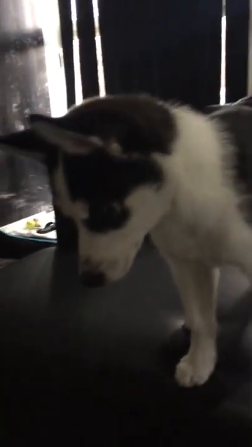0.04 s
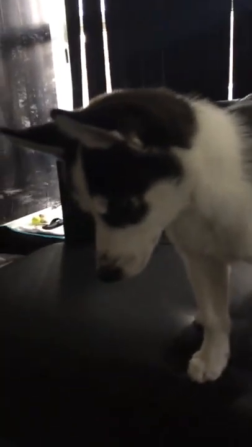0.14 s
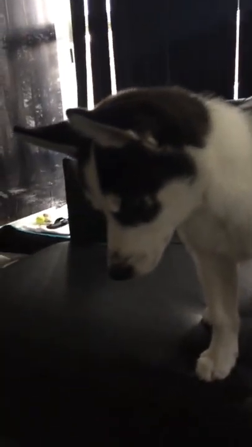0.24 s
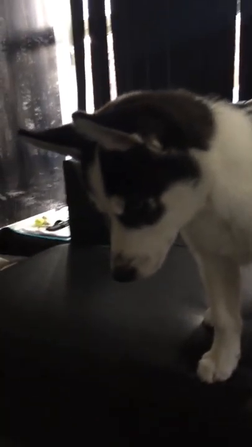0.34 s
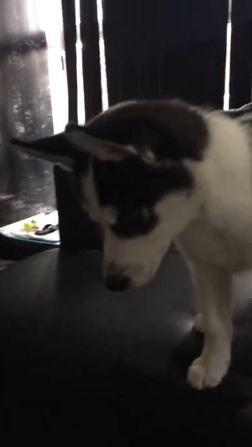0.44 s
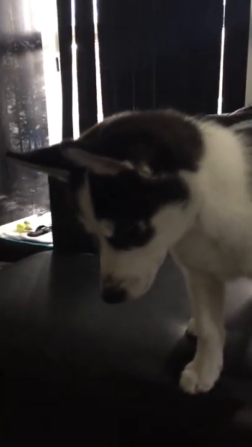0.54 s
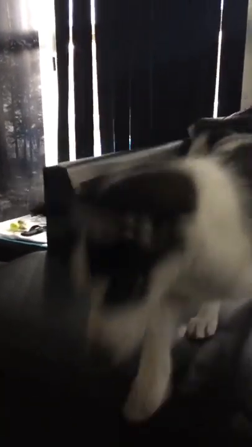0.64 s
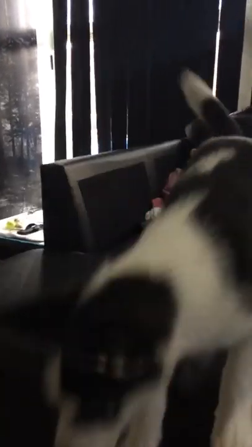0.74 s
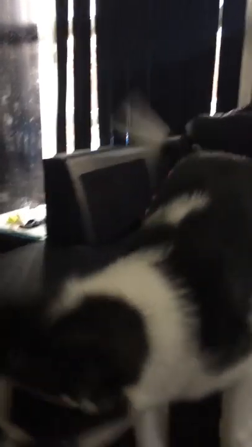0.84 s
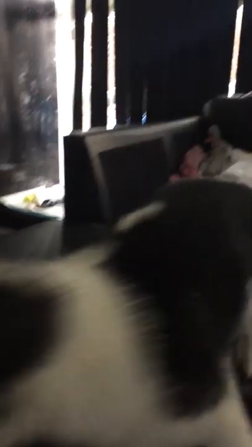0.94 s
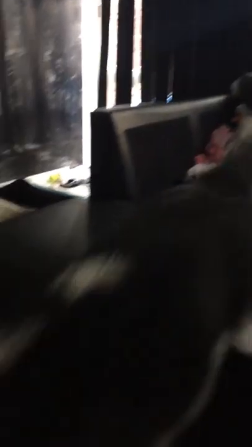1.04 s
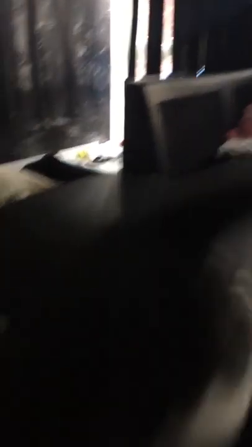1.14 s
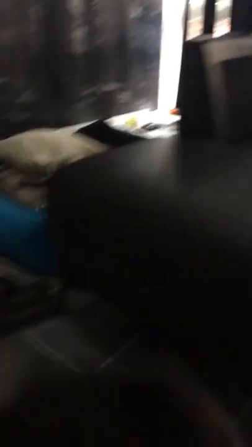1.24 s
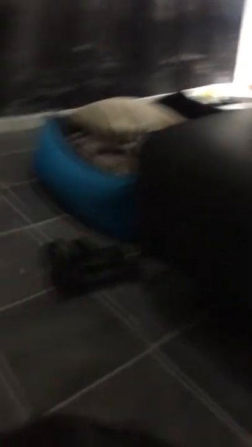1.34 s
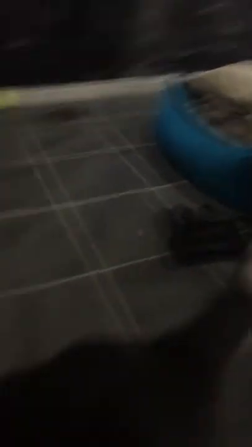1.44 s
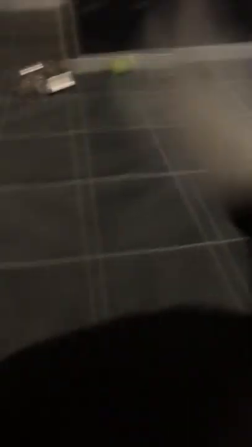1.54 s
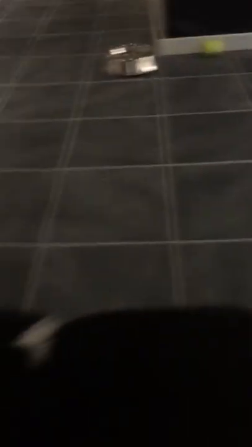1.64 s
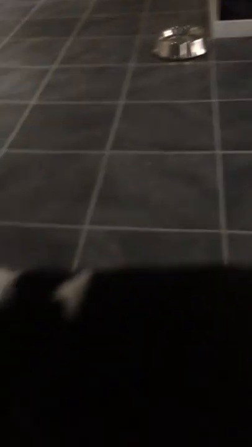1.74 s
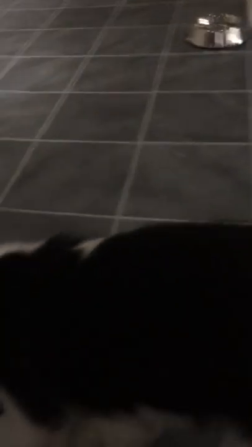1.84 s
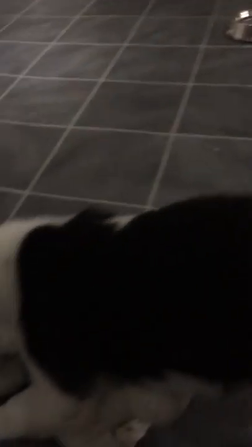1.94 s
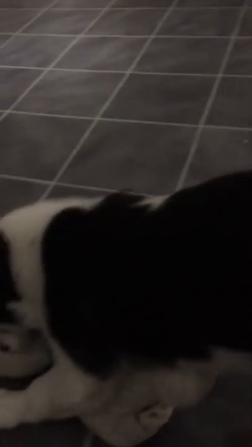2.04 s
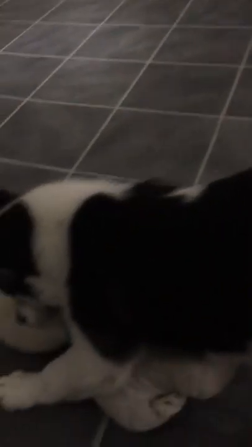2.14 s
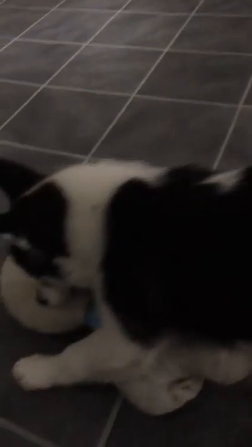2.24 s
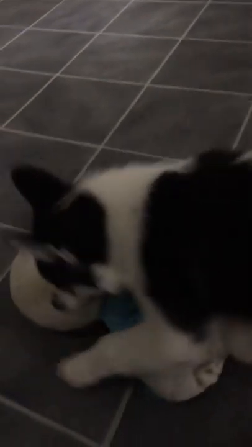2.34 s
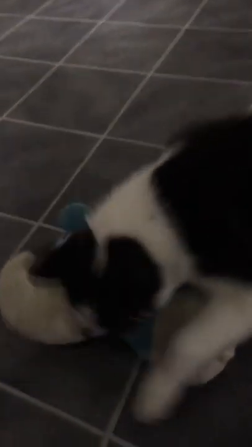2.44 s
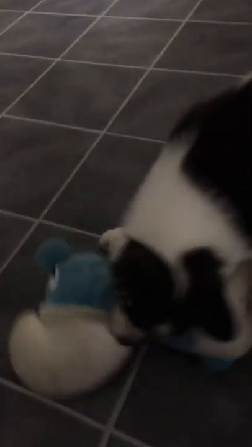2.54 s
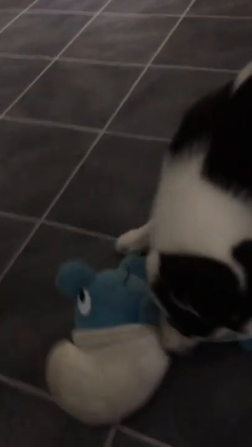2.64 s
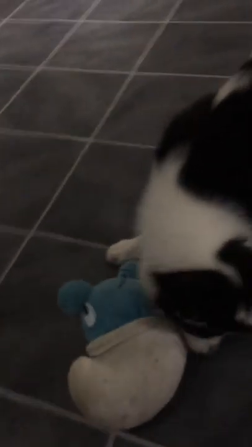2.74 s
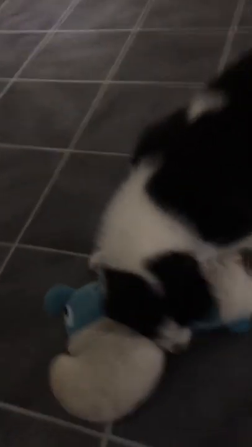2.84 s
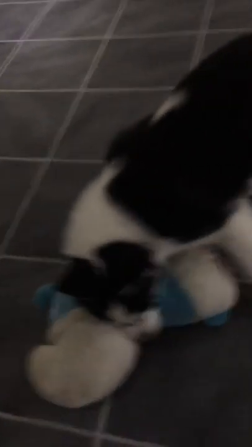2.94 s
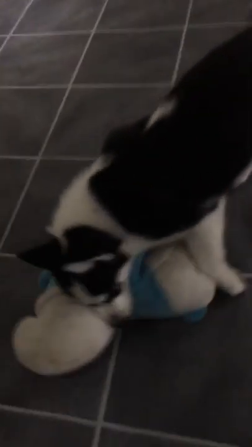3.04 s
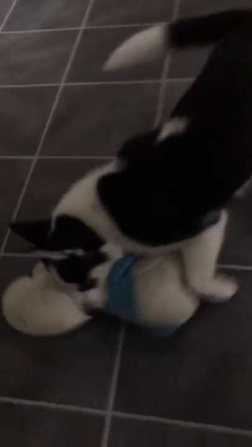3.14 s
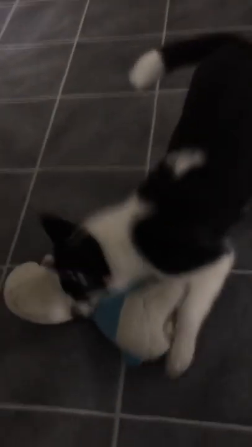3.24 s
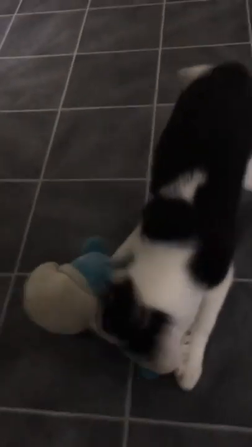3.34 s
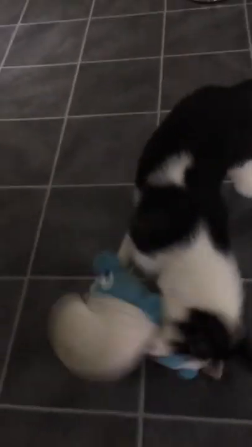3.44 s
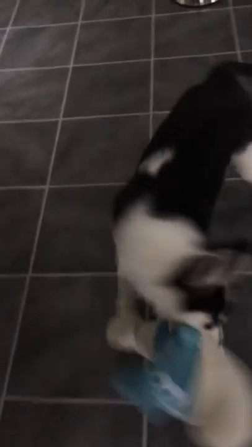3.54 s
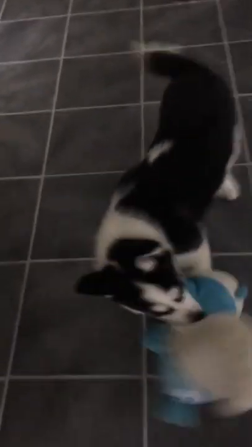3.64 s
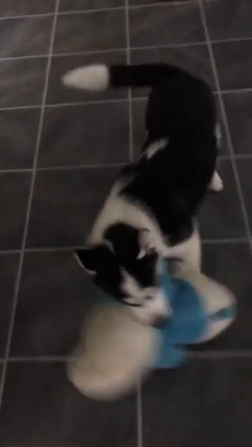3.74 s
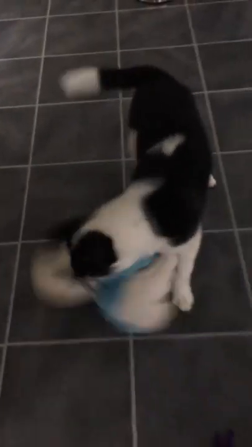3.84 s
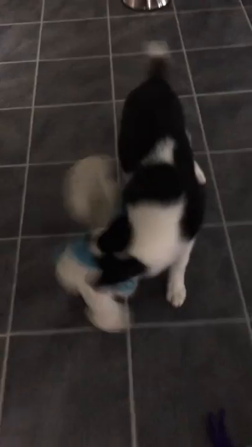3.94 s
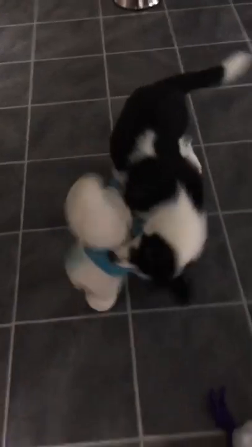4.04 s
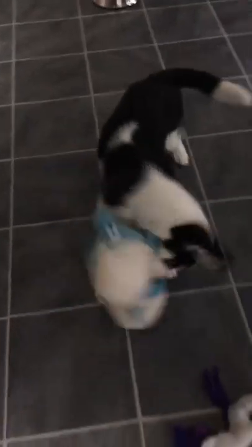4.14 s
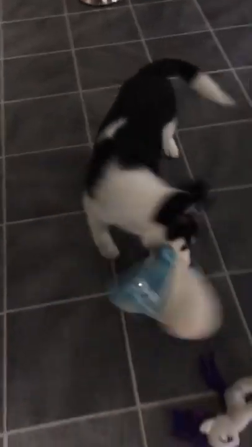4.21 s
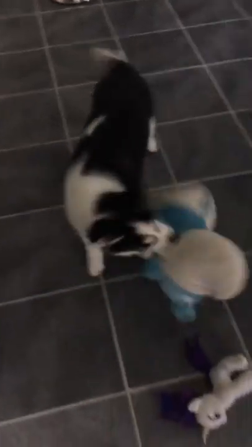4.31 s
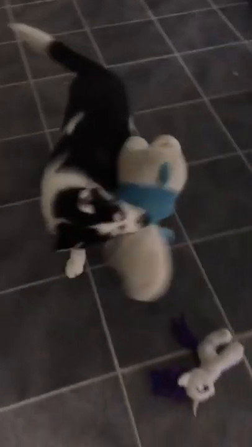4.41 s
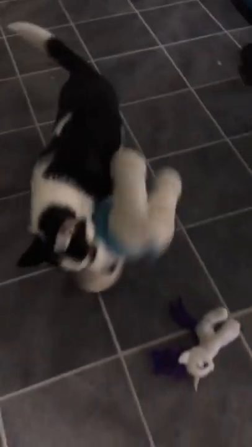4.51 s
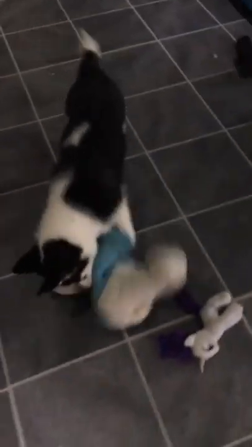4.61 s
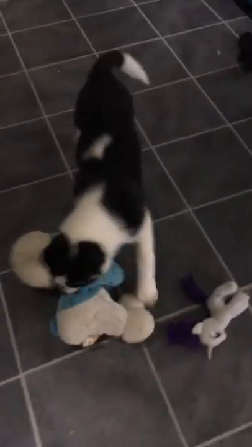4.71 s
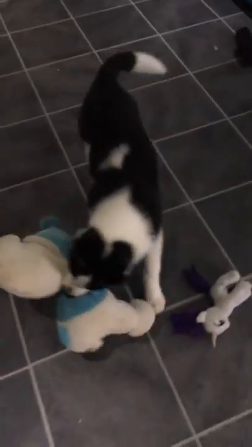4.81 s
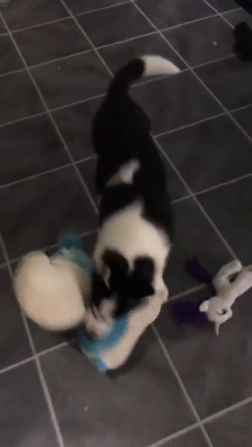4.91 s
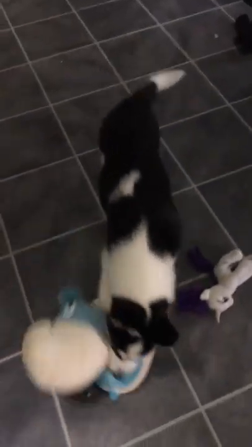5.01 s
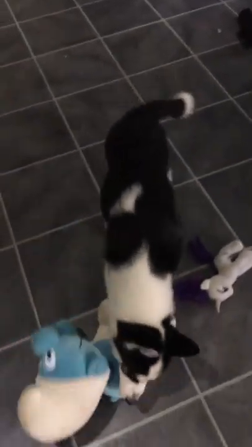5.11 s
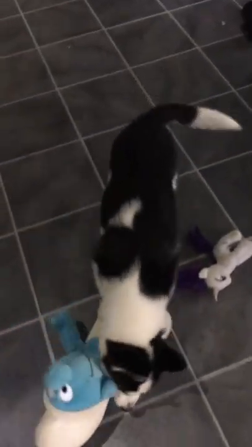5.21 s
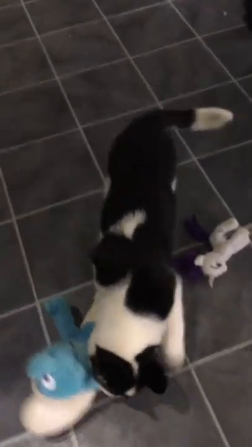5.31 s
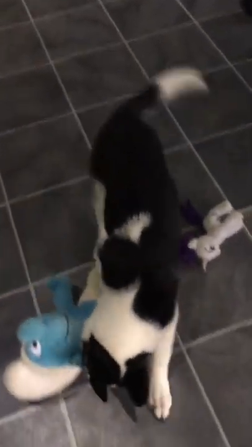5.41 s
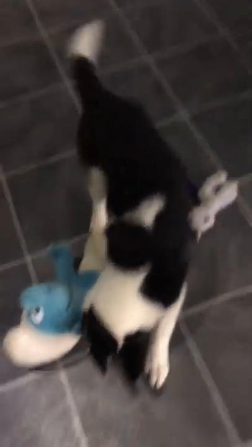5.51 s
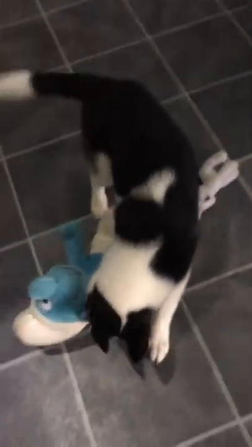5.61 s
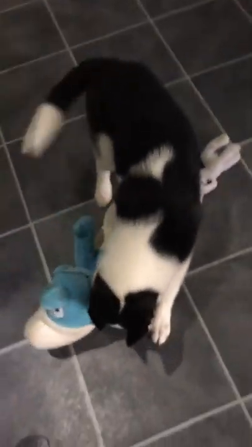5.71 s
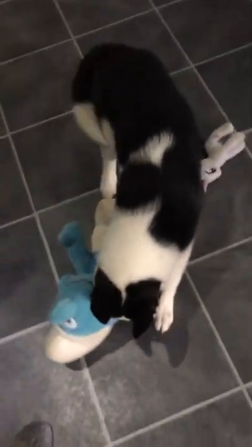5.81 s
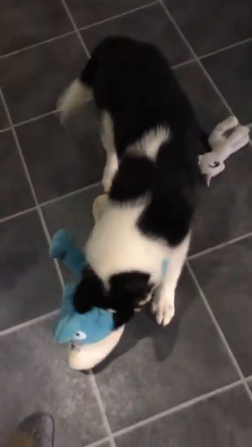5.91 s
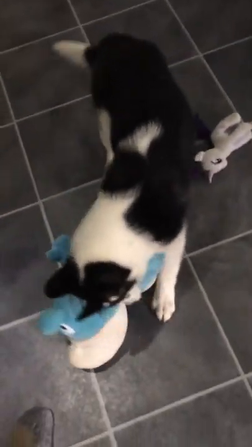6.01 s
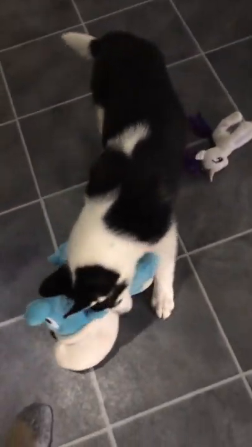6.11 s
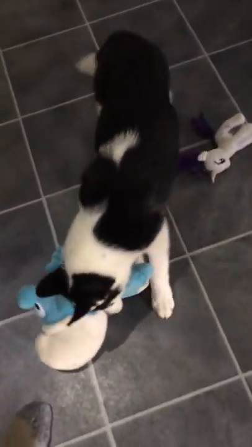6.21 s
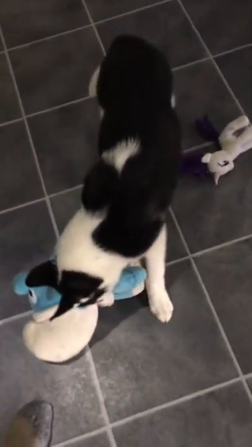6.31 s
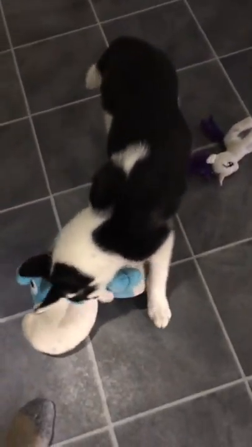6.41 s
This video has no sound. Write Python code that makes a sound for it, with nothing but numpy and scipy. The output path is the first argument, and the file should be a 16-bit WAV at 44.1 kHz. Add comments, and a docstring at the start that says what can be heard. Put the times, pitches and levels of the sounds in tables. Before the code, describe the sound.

Sudden heavy thuds and claw skids as a young dog bounds across hard tiles, followed by quieter plush rubbing, small bumps and short scrapes.

```python
"""Puppy and plush toy in a small tiled room

A puppy jumps from a padded seat, bounds across a tiled floor and wrestles a plush toy.
Seat and slaps: rustling noise under each shove; an air pulse, a crack and ringing surface modes.
Paws and body: short low pushes set the floor and room booming. Claws: brief bursts of noise.
Skids, swishes, drags and rubbing: coloured grains of friction, swelling and fading.
The hard room adds two reflections and a tail; the microphone thins the bass and rounds the peaks."""
import sys
import numpy as np
from scipy import signal
from scipy.fft import rfft, irfft, next_fast_len
from scipy.io import wavfile

SR = 44100
rng = np.random.default_rng(int(sys.argv[2]) if len(sys.argv) > 2 else 0)


def master(y):
    """Save y as 16-bit WAV."""
    cut = np.clip(np.atleast_2d(y).T, -1, 1)
    pcm = np.round(cut * 32767)  # scale
    wavfile.write(sys.argv[1], SR, pcm.astype(np.int16))


N = 284886
TIME = np.arange(N) / SR

# Quiet background of the place. Each row: frequency in Hz, relative level in dB per Hz.
BACKGROUND_SPECTRUM = [(15, -44), (25, -23.5), (53, -5), (102, -9.5), (263, -7.5), (363, -14.5), (659, -19),
                       (734, -23), (840, -33), (1130, -24.5), (2000, -27.5), (5430, -32), (16000, -36.5)]
# How briskly the dog moves about. Each row: time in seconds, level of the rubbing in dB.
MOVEMENT = [(0, -62), (.18, -77), (.58, -75), (.70, -56), (1.2, -60), (1.62, -47), (1.8, -55), (1.9, -64),
            (2.15, -68.5), (2.45, -61), (2.8, -55), (3.55, -62), (3.9, -59), (4.15, -63.5), (4.95, -60),
            (5.25, -58), (5.85, -61), (6.0, -74)]
# Timbre of soft rubbing. Each row: frequency in Hz, relative level in dB per Hz.
RUB_SPECTRUM = [(100, -0.5), (300, 5), (600, -0.5), (1400, -3), (2200, -7.5), (3600, -7), (6000, -15),
                (12000, -28.5)]
# Timbre of swishing fabric and fur. Each row: frequency in Hz, relative level in dB per Hz.
FABRIC_SPECTRUM = [(300, -6), (800, -15), (2000, -3.5), (4000, -3), (7000, 3.5), (10000, 0.5), (13500, 0.5),
                   (16000, -10.5)]
# Paws, body and toy landing. Each row: time in seconds, level of the push in dB,
# pitch of the push in Hz, level in dB of the weight settling after it.
LANDINGS = [(.014, -42, 265, -29.5), (0.791, -28, 109, -44), (.808, -31, 199, -25),
            (0.885, -21.5, 170, -34), (.947, -27, 130, -16), (.986, -15.5, 162, -32),
            (1.269, -8.5, 287, -32), (1.282, -16, 140, -40), (1.314, -23, 203, -48),
            (1.383, -13, 346, -39.5), (1.388, -6.5, 290, -30), (1.397, -8, 208, -36), (1.569, -5, 248, -26),
            (1.609, -14.5, 221, -40), (1.704, -10.5, 308, -30), (2.248, -32, 235, -51),
            (2.485, -33, 280, -44), (2.492, -30.5, 222, -41), (2.633, -35, 218, -52),
            (2.659, -35, 282, -60), (2.808, -32, 230, -40), (2.821, -33, 290, -58),
            (3.004, -34.5, 237, -59), (3.142, -40, 303, -64), (3.284, -38.5, 327, -64),
            (3.377, -32.5, 251, -60), (3.696, -27, 255, -54), (3.706, -33, 253, -71),
            (3.748, -44, 200, -35), (3.783, -41, 200, -45), (3.823, -40, 146, -50),
            (4.762, -28.5, 205, -55), (4.875, -32.5, 243, -33.5), (5.09, -44, 275, -60),
            (5.154, -55, 200, -43), (5.300, -30.5, 227, -60), (5.493, -17.5, 256, -32),
            (5.681, -44, 168, -58)]
# Low resonances of floor and room. Each row: frequency in Hz, level in dB, t60 in seconds.
FLOOR_RESONANCES = [(61.1, -24, 0.13), (134.7, -19, 0.2), (191, -15.5, 0.096), (280, -22, 0.12),
                    (356.7, -14.5, 0.1), (396, -24.5, 0.068), (522, -19.5, 0.22), (583, -17, 0.17),
                    (670, -18, 0.34)]
# Sliding strokes. Each row: time of the peak in seconds, rise in seconds,
# skid on the tile in dB, fabric swish in dB.
SLIDING_STROKES = [(0.694, 0.044, -74, -57), (0.821, 0.03, -57, -44), (.873, .02, -38.5, -32),
                   (.93, .04, -58, -40), (.987, .02, -62, -39.5), (1.277, .005, -55, -37),
                   (1.323, 0.029, -43, -43), (1.392, 0.014, -36, -35), (1.469, .016, -39, -38),
                   (1.509, .013, -29.5, -31), (1.572, .03, -31, -44), (1.71, 0.064, -40, -42),
                   (1.95, .06, -67, -63), (2.246, .004, -62, -58), (2.666, 0.026, -54, -44.5),
                   (2.708, .05, -48, -50), (2.808, .007, -53.5, -49), (2.975, .024, -59, -53.5),
                   (3.08, 0.011, -55.5, -54), (3.148, 0.023, -44.5, -60), (3.21, 0.063, -50.5, -68),
                   (3.295, 0.016, -30.5, -37), (3.33, .034, -26.5, -37), (3.621, .055, -54, -53.5),
                   (3.759, 0.0039, -63, -55), (3.935, .04, -58, -58), (4.278, 0.14, -56.5, -72.5),
                   (4.448, 0.013, -43, -51), (4.494, .024, -41, -56), (4.654, .04, -52, -65.5),
                   (4.762, .008, -55, -70), (5.127, .014, -40.5, -56), (5.17, .06, -52, -68),
                   (5.30, .05, -57, -61), (5.327, .016, -42, -45.5), (5.36, .03, -45, -56),
                   (5.509, 0.014, -51, -54), (5.76, 0.03, -49, -55), (5.824, .055, -43.5, -58),
                   (6.44, 0.078, -66, -68)]
# Timbre of a skid on tile. Each row: frequency in Hz, relative level in dB per Hz.
SKID_SPECTRUM = [(300, -21), (900, -18.5), (1500, -10.5), (2100, -7), (2800, -2), (3800, 2.5), (5200, -2),
                 (7700, -11.5), (14000, -25), (16000, -31)]
# Paws shoving against the padded seat. Each row: time of the peak in seconds, level in dB.
SEAT_SHOVES = [(.803, -35), (.875, -22.5), (.985, -31.5), (1.135, -46)]
# Timbre of the crumpling seat cover. Each row: frequency in Hz, relative level in dB per Hz.
COVER_SPECTRUM = [(30, -15.5), (65, 7.5), (180, 4.5), (400, -6.5), (700, -6), (1200, -9.5), (2400, -8.5),
                  (4500, -30.5), (13000, -40)]
# Sharp slaps on the seat and the floor. Each row: start in seconds, peak of the air pulse in dB,
# inverse of the pulse's length in Hz, level of the crack in dB, level of the shudder in dB.
FLAT_SLAPS = [(0.7869, -23, 1016, -34, -45), (0.8052, -20.5, 1226, -32.5, -37), (0.881, -1, 800, -20, -23),
              (0.8934, -2.5, 2180, -17, -27.5), (0.963, -12, 910, -28.5, -30.5),
              (0.9829, -6, 1420, -14, -31), (1.217, -41, 1500, -52, -49), (1.267, -21, 589, -36.5, -27.5),
              (1.3899, -24, 790, -20, -28), (1.5624, -28, 1200, -30, -36.5),
              (1.572, -30.5, 1200, -27.5, -31.5), (1.708, -35, 904, -28, -40), (3.141, -29, 1400, -45, -50),
              (3.1605, -39, 1230, -48, -50), (3.281, -30, 1400, -42, -49), (5.4891, -20, 680, -37.5, -31),
              (5.516, -42, 601, -56, -37)]
# Modes of the slapped surfaces. Each row: frequency in Hz, typical relative level in dB.
SURFACE_MODES = [(290, -1.5), (410, -0.5), (520, 3), (583, 4.5), (670, 4.5), (740, -6), (837, -4),
                 (920, -2.5), (1082, -5), (1160, -3.5), (1290, -5.5), (1415, -7), (1584, -9), (1807, -14)]
# Single claws on tile. Each row: start in seconds, peak in dB.
CLAW_TICKS = [(1.3918, -16), (1.3989, -21), (1.4735, -22), (1.5033, -18), (1.5115, -18), (2.3044, -41),
              (2.5357, -43), (2.8075, -37), (3.0759, -37), (3.1451, -27), (3.1610, -33), (3.2189, -36),
              (4.4495, -33), (4.4853, -29), (5.3245, -30)]
# Toy dragged softly over the floor. Each row: time of the middle in seconds,
# half length in seconds, centre frequency in Hz, level in dB.
TOY_DRAGS = [(2.41, 0.036, 1420, -59), (2.775, 0.016, 1390, -58.5), (3.825, 0.038, 620, -54),
             (3.835, 0.038, 1530, -58), (3.933, 0.038, 794, -60), (4.934, 0.02, 1130, -59.5)]
# First reflections (about 3 and 6 m of extra path). Each row: delay in seconds, level in dB.
REFLECTIONS = [(.0098, -20.5), (0.0175, -24)]
# Decay of the room, held within limits in room(). Each row: frequency in Hz, t60 in seconds.
ROOM_DECAY = [(100, 0.7), (300, 0.31), (800, 0.57), (2000, 0.5), (4500, .5), (9000, -0.2), (16000, 0.3)]
# Strength of the room's tail. Each row: frequency in Hz, level in dB.
ROOM_LEVEL = [(100, -6.5), (300, -9.5), (800, -10), (2000, -8.5), (4000, -10.5), (9000, -26), (16000, -17)]


def from_db(db):
    """Decibels to gain."""
    return 10 ** (np.asarray(db) / 20)


def rms_one(x):
    """Scale to unit rms."""
    return x / np.sqrt(np.mean(x ** 2) + 1e-20)


def at_hz(points, hz):
    """Read a spectrum on a log-frequency axis."""
    known_hz, values = np.transpose(points)
    return np.interp(np.log(np.maximum(hz, 1)), np.log(known_hz), values)


def butter(x, hz, kind, order=2):
    """Causal Butterworth filter."""
    sections = signal.butter(order, np.minimum(hz, SR / 2 - 100), kind, fs=SR, output="sos")
    return signal.sosfilt(sections, x + 1e-18)


def coloured(x, spectrum):
    """Give a steady excitation a spectrum and unit rms."""
    size = next_fast_len(N)
    gain = from_db(at_hz(spectrum, np.fft.rfftfreq(size, 1 / SR)))
    return rms_one(irfft(rfft(x, size) * gain, size)[:N])


def add(out, s, sound):
    """Mix a short sound in from time s, or from the very start if s is negative."""
    start = max(round(s * SR), 0)
    out[start:start + len(sound)] += sound[:N - start]


def friction(spectrum, grains_per_s, spread_db, judder_db, judder_hz):
    """Countless tiny slips of uneven size, in clumps when the grip judders."""
    slips = (rng.random(N) < grains_per_s / SR) * rng.standard_normal(N)
    sizes = from_db(spread_db * np.minimum(rng.exponential(1, N), 4))
    wander = rms_one(butter(rng.standard_normal(N), judder_hz, "low"))
    grip = from_db(judder_db * wander)
    return coloured(slips * sizes * grip, spectrum)


def slide(rise_s, t60_s):
    """Speed of one slide: a straight rise, then an exponential fall."""
    t = np.arange(SR * 3 // 4) / SR
    return np.minimum(t / rise_s, 1) * from_db(-60 * np.maximum(t - rise_s, 0) / t60_s)


def ring(drive, hz, t60):
    """A damped resonance: a unit click sets a sine of height 1 ringing."""
    radius = from_db(-60 / (t60 * SR))
    angle = 2 * np.pi * hz / SR
    poles = [1, -2 * radius * np.cos(angle), radius * radius]
    return signal.lfilter([0, np.sin(angle)], poles, drive + 1e-18)


def ambience(level_db=-63.5):
    """Steady coloured noise is the quiet background of the place."""
    return from_db(level_db) * coloured(rng.standard_normal(N), BACKGROUND_SPECTRUM)


def shuffle(fur_below_rub_db=9):
    """Fur, plush and paws keep rubbing faintly as the dog moves."""
    s, level_db = np.transpose(MOVEMENT)
    movement = from_db(np.interp(TIME, s, level_db))
    rub = friction(RUB_SPECTRUM, grains_per_s=4600, spread_db=0.5, judder_db=2.0, judder_hz=34.65)
    fur = friction(FABRIC_SPECTRUM, grains_per_s=7500, spread_db=-0.5, judder_db=1.0, judder_hz=30)
    return movement * (rub + from_db(-fur_below_rub_db) * fur)


def thuds(pad_hz=850, body_hz=390, body_t60=0.0053, body_db=-10):
    """A soft pad shoves the floor, settles and rebounds; the body knocks and low resonances boom on."""
    # half length of a push; a gentle contact is more drawn out, per dB below full scale
    hard_cycles, soft_cycles_per_db = 0.48, .003
    # the weight settles slow and deep in one short heave
    settle_s, settle_hz, settle_cycles = .011, 98, .42
    # the paw rebounds softer and a little lower
    rebound_s, rebound_loss_db, rebound_pitch_share = .031, 17, .9

    push = np.zeros(N)
    t = np.arange(-SR // 50, SR // 50) / SR
    for land_s, land_db, land_hz, weight_db in LANDINGS:
        land_cycles = hard_cycles - soft_cycles_per_db * land_db
        contacts = [
            (land_s, land_db, land_hz, land_cycles),
            (land_s + settle_s, weight_db, settle_hz, settle_cycles),
            (land_s + rebound_s, land_db - rebound_loss_db, land_hz * rebound_pitch_share, land_cycles)]
        for s, db, hz, cycles in contacts:
            swell = np.exp(-.5 * (t * hz / cycles) ** 2)
            add(push, s + t[0], from_db(db) * np.cos(2 * np.pi * hz * t) * swell)

    swing = np.gradient(push)
    body = from_db(body_db) * ring(swing, body_hz, body_t60) / np.pi
    boom = sum(from_db(db) * ring(swing, hz, t60) for hz, db, t60 in FLOOR_RESONANCES) / np.pi
    return butter(push + body + boom, pad_hz, "low")


def strokes(typical_fall_s=0.32, typical_rise_s=0.023, fall_exponent=0.27, swish_fall_share=.8):
    """Each slide speeds up and dies away, rasping on the tile and swishing in the fabric."""
    skid_power, swish_power = np.zeros(N), np.zeros(N)
    for s, rise, skid_db, swish_db in SLIDING_STROKES:
        # a stroke that starts slowly also dies slowly (t60); the swish dies before the skid
        fall = typical_fall_s * (rise / typical_rise_s) ** fall_exponent
        skid_speed = slide(rise, fall)
        swish_speed = slide(rise, fall * swish_fall_share)
        add(skid_power, s - rise, (skid_speed * from_db(skid_db)) ** 2)
        add(swish_power, s - rise, (swish_speed * from_db(swish_db)) ** 2)
    skid = friction(SKID_SPECTRUM, grains_per_s=12000, spread_db=-0.1, judder_db=0.5, judder_hz=140)
    swish = friction(FABRIC_SPECTRUM, grains_per_s=18000, spread_db=0.5, judder_db=1.6, judder_hz=110)
    return np.sqrt(skid_power) * skid + np.sqrt(swish_power) * swish


def seat(rise_s=.025, t60_s=.42, sag_hz=70, sag_width_hz=50, sag_db=-11):
    """The padded cover crumples under each shove of the leap, and the cushion heaves below it."""
    pressure = np.zeros(N)
    for s, db in SEAT_SHOVES:
        add(pressure, s - rise_s, from_db(db) * slide(rise_s, t60_s))
    cover = friction(COVER_SPECTRUM, grains_per_s=9000, spread_db=0.8, judder_db=4.5, judder_hz=70)
    sag_band = [sag_hz - sag_width_hz / 2, sag_hz + sag_width_hz / 2]
    cushion = rms_one(butter(rng.standard_normal(N), sag_band, "band", order=1))
    return pressure * (cover + from_db(sag_db) * cushion)


def slaps(crack_t60=0.015, crack_low_hz=1100, crack_high_hz=12000, shudder_t60=0.063):
    """A flat contact gives one push and pull of the air, a short crack and a shudder of the surface."""
    out, t = np.zeros(N), np.arange(SR // 6) / SR
    mode_hz, mode_db = np.transpose(SURFACE_MODES)
    modes = np.sin(2 * np.pi * np.outer(mode_hz, t))
    for s, db, hz, crack_db, shudder_db in FLAT_SLAPS:
        swing = butter((1 - 2 * t * hz) * (t * hz < 1), 3 * hz, "low")
        pulse = swing / np.abs(swing).max()

        hiss = butter(rng.standard_normal(len(t)), [crack_low_hz, crack_high_hz], "band", order=1)
        crack = hiss * from_db(-60 * t / crack_t60)

        # every slap excites the modes a little differently
        strengths = from_db(mode_db + rng.normal(0, 3.3, len(mode_db)))
        signs = rng.choice([-1, 1], len(mode_db))
        shudder = (strengths * signs) @ modes * from_db(-60 * t / shudder_t60) / 2

        add(out, s, from_db(db) * pulse + from_db(crack_db) * crack + from_db(shudder_db) * shudder)
    return out


def skitter(start_s=1.292, end_s=1.713, level_db=-41.5, low_hz=2400, high_hz=7500):
    """Claws scrabble for grip during the bound, thickest in the middle of it."""
    effort = np.sin(np.pi * np.clip((TIME - start_s) / (end_s - start_s), 0, 1))
    # up to 130 catches a second
    catches = (rng.random(N) < 130 * effort / SR) * rng.uniform(.4, 1, N)
    # each catch scratches for about a millisecond
    scratch_envelope = signal.lfilter([1], [1, -np.exp(-1 / (.001 * SR))], catches + 1e-18)
    scratch = scratch_envelope * rng.standard_normal(N)
    ticks = butter(scratch, [low_hz, high_hz], "band", order=3) * effort
    return from_db(level_db) * rms_one(ticks) * np.sqrt(np.mean(effort ** 2))


def claws(low_hz=1800, high_hz=6500, t60_s=.009):
    """A claw tip ticks on the hard tile and dies within milliseconds."""
    out, t = np.zeros(N), np.arange(SR // 50) / SR
    fade = from_db(-60 * t / t60_s)
    for s, db in CLAW_TICKS:
        tick = butter(rng.standard_normal(len(t)) * fade, [low_hz, high_hz], "band")
        add(out, s, from_db(db) * tick / np.abs(tick).max())
    return out


def drags(width_share=0.5):
    """Plush dragged with light pressure rasps in one narrow band."""
    out = np.zeros(N)
    # zero judder: an even grip
    rasp = friction(RUB_SPECTRUM, grains_per_s=3200, spread_db=-1.0, judder_db=0, judder_hz=60)
    for s, half_s, hz, db in TOY_DRAGS:
        edges = hz * np.exp([-width_share / 2, width_share / 2])
        band = rms_one(butter(rasp, edges, "band"))
        swell = np.exp(-.5 * ((TIME - s) / half_s) ** 2)
        out += from_db(db) * band * swell
    return out


def room(x, first_s=0.0071, build_s=.012):
    """Two near reflections, and a diffuse tail that builds up and dies band by band."""
    t = np.arange(SR * 3 // 4) / SR
    edges = 40 * 2. ** np.arange(10)  # octave bands, Hz
    response = np.zeros(len(t))
    for low, high in zip(edges, edges[1:]):
        centre_hz = np.sqrt(low * high)
        t60 = np.clip(at_hz(ROOM_DECAY, centre_hz), .15, .7)
        build_up = np.clip((t - first_s) / build_s, 0, 1)
        tail = butter(rng.standard_normal(len(t)), [low, high], "band")
        tail = tail * build_up * from_db(-60 * t / t60)
        # energy in proportion to the width of the band
        band_gain = from_db(at_hz(ROOM_LEVEL, centre_hz)) * np.sqrt(2 * (high - low) / SR)
        response += band_gain * tail / np.linalg.norm(tail)
    for delay, db in REFLECTIONS:
        response[round(delay * SR)] += from_db(db)
    return x + signal.fftconvolve(x, response)[:N]


def scene():
    """The romp in its room, over a quiet background."""
    blows = thuds() + slaps() + skitter() + claws()
    rubbing = shuffle() + strokes() + seat() + drags()
    return (room(blows + rubbing) + ambience())[None]


def record(dry, cutoff_hz=16000):
    """The microphone loses the deepest bass and rounds the highest peaks; the top is cut."""
    thinned = butter(dry, 30, "high")
    rounded = thinned / (1 + (thinned / .9) ** 6) ** (1 / 6)
    # tenth order, 0.1 dB ripple, 70 dB down above the cutoff
    top_cut = signal.ellip(10, .1, 70, cutoff_hz, fs=SR, output="sos")
    return signal.sosfilt(top_cut, rounded)


dry = scene()
out = record(dry)
master(out)
```